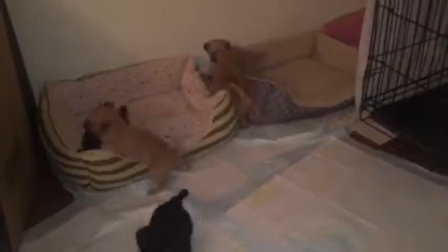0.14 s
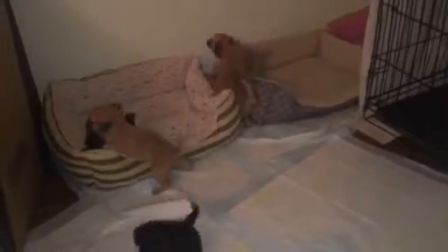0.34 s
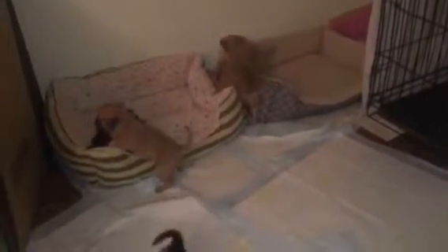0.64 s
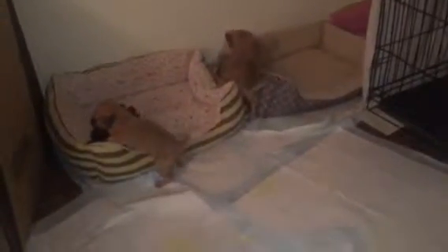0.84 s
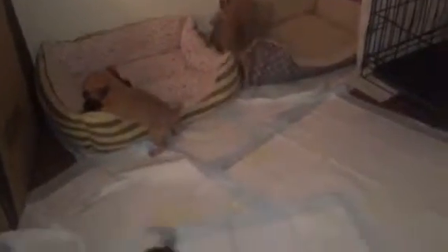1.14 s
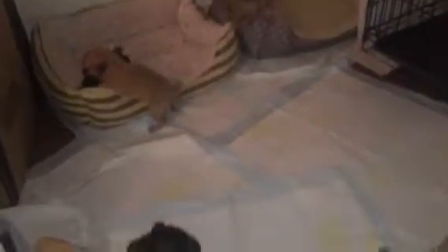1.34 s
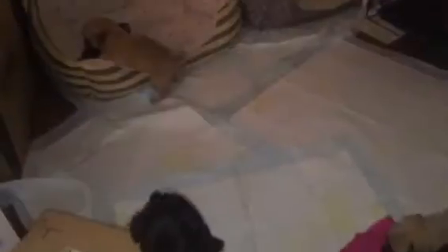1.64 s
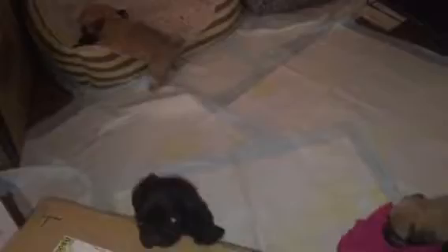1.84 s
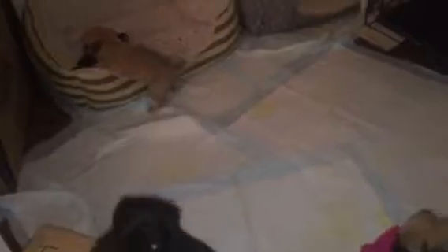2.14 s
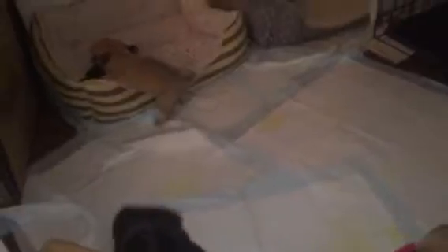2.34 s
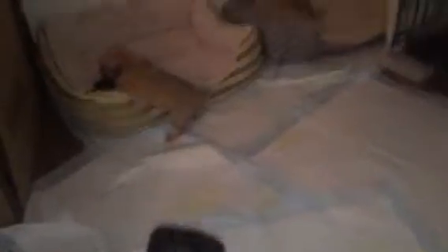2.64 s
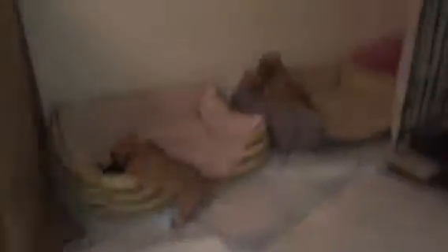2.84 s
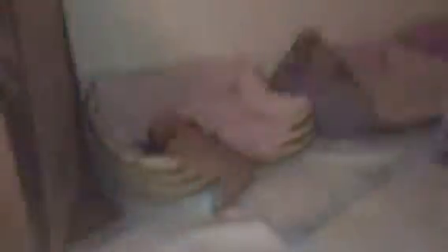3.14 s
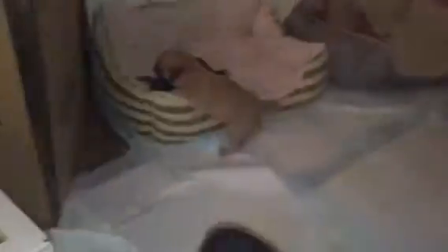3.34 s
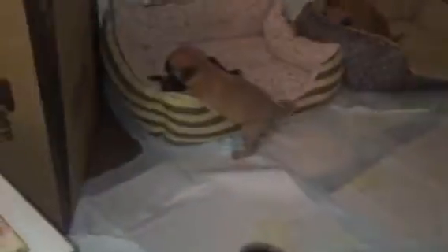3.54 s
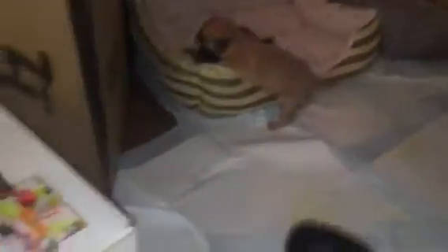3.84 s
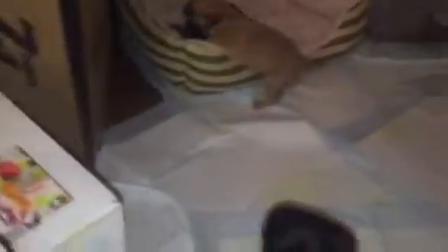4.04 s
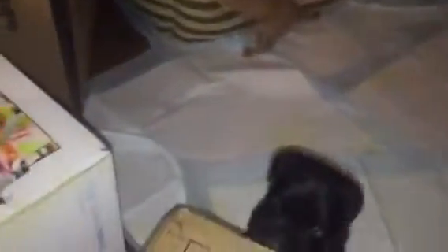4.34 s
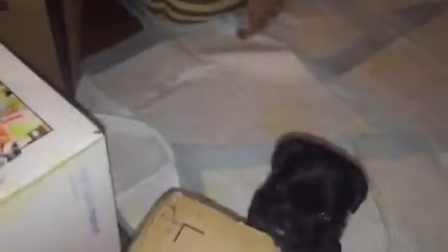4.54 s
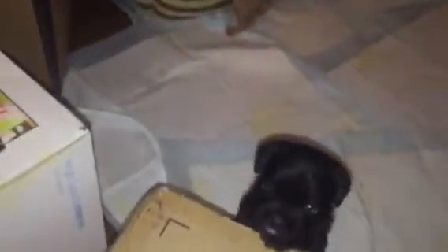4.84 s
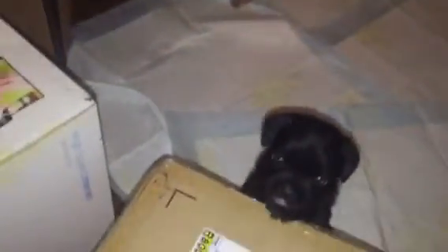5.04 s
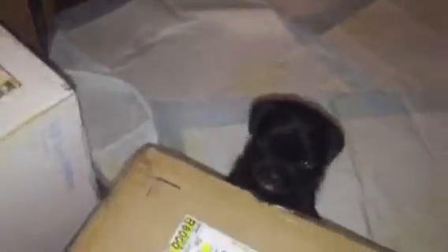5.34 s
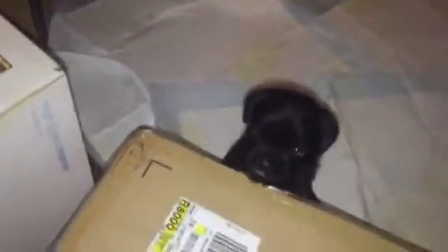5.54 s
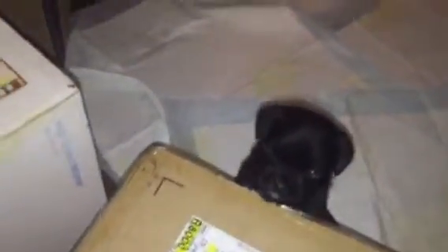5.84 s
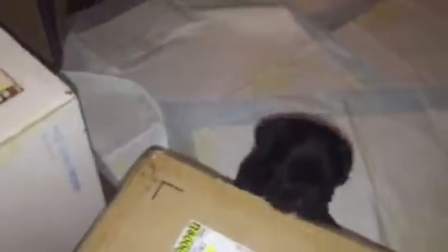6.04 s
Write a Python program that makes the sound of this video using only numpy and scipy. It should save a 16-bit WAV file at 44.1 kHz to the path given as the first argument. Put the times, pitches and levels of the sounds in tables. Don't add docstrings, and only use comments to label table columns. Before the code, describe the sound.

Young puppies scrabble over crinkly plastic-backed pads in a small room, claws ticking and bodies bumping a hollow box, with one short hoarse whine over a low hum.

```python
import sys
import numpy as np
from scipy import signal
from scipy.fft import rfft, irfft, next_fast_len
from scipy.io import wavfile
from scipy.ndimage import uniform_filter1d, map_coordinates

SR = 44100
rng = np.random.default_rng(int(sys.argv[2]) if len(sys.argv) > 2 else 0)


def gain_from_db(level_db):
    decades = np.asarray(level_db, float) / 20
    return 10 ** decades


def to_wav(s):
    ch = np.atleast_2d(s).T
    pcm = np.round(np.clip(ch, -1, 1) * 32767)
    wavfile.write(sys.argv[1], SR, pcm.astype(np.int16))


N = 272538
SOFT_BUMP = 0.052


def unit(x):
    return x / np.sqrt(np.mean(x ** 2) + 1e-20)


def along(points, hz):
    f, v = np.transpose(points)
    return np.interp(np.log(hz + 1), np.log(f + 1), v)


def curves(rows):
    s, *columns = np.transpose(rows)
    t = np.arange(N) / SR
    return [np.interp(t, s, column) for column in columns]


def wobble(rate):
    knots = rng.standard_normal(int(N * rate / SR) + 4)
    return map_coordinates(knots, [np.arange(N) * rate / SR])


def swell(peak_s, rise_s, fall_s, db):
    marks = np.arange(0, N + 32, 32)
    t = marks / SR - peak_s
    distance = np.where(t < 0, -t / max(rise_s, .002), t / max(fall_s, .002))
    gain = gain_from_db(db - 20 * distance ** 1.16)
    return np.interp(np.arange(N), marks, gain)


def filtered(x, response):
    m = next_fast_len(len(x) + 4096)
    return irfft(rfft(x, m) * response(np.fft.rfftfreq(m, 1 / SR)), m)[:len(x)]


def ring(hz, width_hz):
    return lambda f: 1j * f * width_hz / (hz * hz - f * f + 1j * f * width_hz + 1e-9)


def add(track, s, sound):
    part = track[round(s * SR):][:len(sound)]
    part += sound[:len(part)]


def bump_rows():
    # start in seconds, peak in dB, note in Hz, 60 dB decay in seconds.
    flops = [(0.159, -51, 102, 0.035), (0.464, -61, 310, 0.13), (0.959, -48.5, 282, 0.17),
             (1.085, -37, 265, 0.055), (1.097, -35, 260.4, 0.15), (1.17, -50, 137, 0.13),
             (2.046, -55.5, 74, 0.044), (2.465, -44.5, 70, 0.039), (2.579, -43.5, 238, 0.077),
             (2.595, -47.5, 208, 0.16), (4.092, -42, 397, 0.046), (4.135, -41, 103, 0.054),
             (4.206, -62, 71, 0.042), (4.548, -47, 278, 0.056), (6.081, -52.5, 84, 0.058),
             (6.142, -52.5, 350, 0.1)]
    # start in seconds, peak in dB, note in Hz, 60 dB decay in seconds.
    knocks = [
        (.931, -36, 107, 0.1),
        (1.032, -39.5, 101, 0.1),
        (1.76, -49, 253, 0.27),
        (1.851, -47, 310, 0.043),
        (2.212, -30.5, 189, 0.065),
        (2.226, -37, 169, 0.063),
        (3.221, -47.5, 101, 0.049),
        (3.424, -41.5, 530, 0.053),
        (5.363, -40, 138, 0.0091),
        (5.671, -51, 126, 0.016),
    ]
    return sorted([(*row, SOFT_BUMP) for row in flops] + [(*row, 0.22) for row in knocks])


def background():
    # time in seconds, level in dB.
    hum_levels = [(0, -59), (.85, -58), (1.0, -73), (1.35, -60), (2.4, -64.5), (3.25, -63.5), (3.4, -69),
                  (3.63, -68), (3.85, -82), (4.1, -60), (4.35, -73.5), (4.7, -64.5), (5.4, -73.5),
                  (5.9, -68), (6.18, -68)]
    # time in seconds, level in dB.
    fifth_levels = [(0, -84), (.6, -75), (1.2, -78.5), (1.6, -72.5), (2.0, -71), (2.4, -73), (2.9, -67),
                    (3.3, -72), (3.5, -75), (3.85, -76), (4.0, -69), (4.35, -73), (4.55, -90), (5.0, -74.5),
                    (5.4, -81.5), (5.6, -96), (5.9, -86), (6.18, -71)]
    # fastest moment, rise and fall in seconds, rumble in dB.
    pans = [
        (3.05, 1.8, 1, -63),
        (4.65, 0.84, 1.0, -72.5),
    ]
    # frequency in Hz, level in dB per Hz.
    rumble_tone = [(12, -63), (20, -22), (61, -7), (91, -6), (113, -0.5), (145, -7), (174, -7),
                   (450, -28.5), (580, -65), (990, -120)]
    # frequency in Hz, level in dB per Hz.
    air_tone = [(180, -29), (300, 6), (537, -20), (593, -18), (645, 1), (1030, 3), (1560, -9), (4160, -4.5),
                (10400, -9.5), (14700, -13.5), (16000, -8.5)]
    hum_db, = curves(hum_levels)
    fifth_db, = curves(fifth_levels)
    sway_db = 2.5 * (np.arange(N) / SR > 0.85)
    shake = gain_from_db(-70 + 0.1 * (hum_db - hum_db.mean())) + sum(swell(*row) for row in pans)
    floor_t60_s = 1.42
    fade_db = -60 * np.arange(SR) / SR / floor_t60_s
    for s, db, hz, t60, hard in bump_rows():
        add(shake, s, 10 * t60 * gain_from_db(db - 27.5 + fade_db))
    mains_hz = 120
    phase = 2 * np.pi * mains_hz * np.arange(N) / SR
    hum = gain_from_db(hum_db + 3 + (.7 + sway_db) * wobble(14)) * np.sin(phase + .2 * wobble(6))
    fifth = gain_from_db(fifth_db - 1.5 + 4.5 * wobble(20)) * np.sin(5 * phase + .3 * wobble(10))
    rumble = unit(filtered(rng.standard_normal(N), lambda f: gain_from_db(along(rumble_tone, f))))
    hiss = unit(filtered(rng.standard_normal(N), lambda f: gain_from_db(along(air_tone, f))))
    return hum + fifth + shake * gain_from_db(3 * wobble(9)) * rumble + gain_from_db(-75 + 1.4 * wobble(3.03)) * hiss


def room(x):
    # frequency in Hz, 60 dB decay in seconds.
    decay = [(300, 0.44), (2000, 0.12), (12000, 0.098)]
    hz, t, z = signal.stft(rng.standard_normal(SR // 2), SR, nperseg=256)
    tail = signal.istft(z * gain_from_db(-60 * t / along(decay, hz)[:, None]), SR, nperseg=256)[1]
    return signal.fftconvolve(np.pad(x, (200, 0)), tail / np.linalg.norm(tail))[:N]


def walls(x):
    # delay in seconds, level in dB.
    echoes = [
        (.0011, -47),
        (.0029, -32),
        (.0052, -24),
    ]
    return filtered(x, lambda f: 1 + sum(gain_from_db(db) * np.exp(-2j * np.pi * f * s) for s, db in echoes))


def creases(spiky_db):
    return rng.standard_normal(N) * gain_from_db(spiky_db * wobble(900) + 2.03 * wobble(70))


def stir():
    # time in seconds, level in dB.
    busy = [(0.0, -64.5), (0.65, -71), (0.95, -68.5), (1.08, -58.5), (1.29, -62), (1.58, -64.5),
            (2.12, -72), (2.34, -65), (2.87, -71.5), (3.03, -62), (3.42, -64.5), (3.61, -68), (3.75, -64),
            (4.04, -62), (4.65, -70), (5.15, -72.5), (6.09, -75), (6.14, -47), (6.18, -57)]
    # centre in Hz, width in Hz, level in dB.
    bedding = [(1550, 740, 3.5), (2640, 346, 4.5), (3000, 900, -0.5)]
    # peak in seconds, fade in seconds, level in dB.
    brushes = [
        (0.0, 0.79, -64.5),
        (1.58, 0.6, -68),
        (3.2, 0.46, -73),
        (6.1, 0.97, -76.5),
    ]
    rustle_db, = curves(busy)
    body_db = -68 + 0.84 * (rustle_db - rustle_db.mean())
    brushing = sum(swell(s, fade_s, fade_s, db) for s, fade_s, db in brushes)
    cloth = lambda f: sum((-1) ** k * gain_from_db(db) * ring(hz, w)(f) for k, (hz, w, db) in enumerate(bedding))
    rustle = gain_from_db(rustle_db - 1.0 + 4.2 * wobble(21.63)) * unit(filtered(creases(spiky_db=1.0), cloth))
    fur = unit(filtered(creases(spiky_db=0.0), lambda f: ring(5500, 1800)(f) ** 2))
    hiss = brushing * gain_from_db(-1.5 + 0.54 * wobble(14)) * fur
    patches_db = 3 * wobble(25)
    soft = unit(filtered(creases(spiky_db=2.5), lambda f: ring(330, 600)(f) ** 2))
    return rustle + hiss + gain_from_db(body_db - 6.0 + patches_db) * soft


def bumps(rows):
    out, t = np.zeros(N), np.arange(SR // 2) / SR
    for s, db, hz, t60, hard in rows:
        shape = gain_from_db(-60 * t / max(t60, .02)) * (1 - np.exp(-t / 0.0017))
        panel_hz = rng.uniform([170, 240, 320], [240, 300, 400])
        panels = sum(np.sin(2 * np.pi * f * t) * rng.uniform(0.1, 1) for f in panel_hz)
        note = shape * (np.sin(2 * np.pi * hz * t) + 0.79 * panels)
        shove = (1 - t / .0007) * np.exp(-t / .0007) * (1 - np.exp(-t / .0004))
        add(out, s, gain_from_db(db + 3.0) * (note + hard * shove))
    return out


def more_flops():
    # start in seconds, peak in dB, note in Hz, 60 dB decay in seconds.
    pushes = [
        (.385, -57.5, 203, .08),
        (1.13, -46.5, 301, 0.14),
        (1.875, -52, 200, 0.086),
        (2.093, -47, 172, 0.12),
        (2.187, -43.5, 430, 0.038),
        (3.226, -43.5, 220, 0.032),
        (3.97, -56, 330, 0.078),
    ]
    return bumps([(*row, SOFT_BUMP) for row in pushes])


def whine():
    # time in seconds, pitch in Hz, level in dB.
    cry = [
        (2.812, 780, -83),
        (2.825, 790, -48),
        (2.84, 835, -54),
        (2.866, 797, -39.5),
        (2.885, 754, -61),
        (2.905, 790, -60),
        (2.93, 790, -76),
    ]
    hz, db = curves(cry)
    phase = 2 * np.pi * np.cumsum(hz * (1 + .05 * wobble(400))) / SR
    throat = lambda f: ring(800, 220)(f) ** 2 - 0.19 * ring(2100, 900)(f) ** 2
    breath = unit(filtered(rng.standard_normal(N), throat))
    voice = .45 * np.sin(phase) + .8 * breath
    t = np.arange(N) / SR
    return gain_from_db(db - 4.0 + 3.8 * wobble(160)) * voice * (t > cry[0][0]) * (t < cry[-1][0])


def sizzle():
    # fastest moment, rise and fall in seconds, level in dB.
    skims = [
        (2.421, 0.067, .1, -73),
        (2.86, .03, .06, -71),
        (3.01, 0.099, 0.036, -59),
        (3.69, .08, .05, -69),
        (3.93, .1, .04, -74),
        (5.56, 0.055, .04, -63),
    ]
    grain = unit(filtered(creases(spiky_db=2.5), lambda f: ring(7500, 2200)(f) ** 2))
    return sum(swell(*row) for row in skims) * grain


def scuffs():
    # fastest moment, rise and fall in seconds, level in dB, resonance in Hz.
    rubs = [(.26, 0.054, .05, -67, 1300), (.45, .04, .05, -61.5, 683), (.91, .015, 0.033, -49, 1700),
            (1.055, .03, 0.015, -58, 2800), (1.1, 0.012, 0.045, -48, 1700), (1.171, 0.0088, .02, -48, 2730),
            (1.24, .02, .05, -55, 1680), (1.33, .02, .03, -61, 2600), (1.46, 0.033, 0.044, -59.5, 1710),
            (1.57, 0.017, 0.018, -63, 1750), (1.605, .02, 0.028, -63, 2000), (1.88, .02, 0.049, -54, 2600),
            (2.42, 0.066, 0.038, -52, 3000), (2.6, 0.033, 0.065, -56, 3000), (2.85, .04, 0.076, -55, 2100),
            (2.97, .04, 0.037, -54.5, 2840), (3.02, .03, .05, -53.5, 2600), (3.12, 0.066, .06, -55, 2230),
            (3.45, .02, 0.053, -54, 4200), (3.575, .02, .03, -59, 2000), (3.675, 0.045, .07, -55, 3100),
            (3.8, .03, .04, -62, 1500), (3.88, .04, .05, -62, 900), (3.93, .08, .05, -63, 2400),
            (4.094, 0.013, 0.024, -31.5, 3310), (4.19, .04, 0.069, -65, 2630),
            (4.4, 0.025, 0.044, -63, 3200), (4.46, .03, 0.068, -66, 2490), (4.55, .003, .012, -44, 2200),
            (4.57, .015, .05, -54, 3580), (4.77, .05, .08, -64.5, 1600), (4.89, .02, 0.027, -62, 1890),
            (4.93, .02, .02, -72, 1900), (5.15, .08, 0.072, -72, 1800), (6.045, 0.016, .03, -70, 2180),
            (6.125, .015, .015, -49.5, 1390)]
    out, grain, reach = np.zeros(N), creases(spiky_db=4), SR // 5
    for s, rise_s, fall_s, db, hz in rubs:
        near = slice(max(round(s * SR) - reach, 0), round(s * SR) + reach)
        song = unit(filtered(grain[near], lambda f: ring(hz, hz / 4.5)(f) ** 2))
        out[near] += swell(s, rise_s, fall_s, db)[near] * song
    return out


def crinkle(lo_hz, hi_hz, spiky_db):
    # frequency in Hz, level in dB per Hz.
    sheet_tone = [(210, -33), (350, -5), (1100, -9.5), (1600, -1.5), (2800, -1.5), (4000, -4.5),
                  (5000, -10), (6300, -1.5), (10400, -12), (14500, -11), (16000, -22)]
    edges = lambda f: np.sqrt((1 + (lo_hz / (f + 1)) ** 8) * (1 + (f / hi_hz) ** 8))
    return unit(filtered(creases(spiky_db), lambda f: gain_from_db(along(sheet_tone, f)) / edges(f)))


def pocket(x, centre_hz, width_hz, lift):
    f, t, z = signal.stft(x, SR, nperseg=512)
    centre = np.interp(t * SR, np.arange(N), centre_hz)
    ridges = uniform_filter1d(rng.standard_normal(z.shape), size=2, axis=0)
    ridges = unit(uniform_filter1d(ridges, size=8, axis=1))
    gain = (1 + lift / (1 + ((f[:, None] - centre) / width_hz) ** 2)) * gain_from_db(3.2 * ridges)
    return unit(signal.istft(z * gain, SR, nperseg=512)[1][:N])


def drag():
    # fastest moment, rise and fall in seconds, level in dB, air pocket in Hz.
    kneads = [
        (.45, 0.1, 0.084, -72.5, 1810),
        (2.22, 0.058, 0.02, -60, 2300),
        (2.6, 0.023, 0.2, -76, 2650),
    ]
    skids = [
        (.965, 0.035, 0.076, -45.5, 2360),
        (1.168, 0.014, 0.055, -48, 2570),
        (1.225, 0.0064, 0.08, -52.5, 1650),
        (2.095, 0.014, 0.064, -48.5, 2520),
        (2.49, 0.05, 0.07, -63.5, 2850),
        (2.99, 0.1, 0.066, -55.5, 2880),
        (3.7, 0.082, 0.053, -57, 3100),
        (5.58, 0.044, 0.039, -48.5, 2860),
        (2.42, 0.029, 0.19, -56, 2950),
        (2.845, 0.011, 0.072, -77, 2260),
    ]
    slides = [
        (.256, 0.057, 0.035, -58, 2200),
        (.924, 0.034, 0.012, -41.5, 2280),
        (1.12, .012, 0.058, -47.5, 2250),
        (1.309, 0.0039, 0.034, -58, 1770),
        (1.875, 0.049, 0.067, -53.5, 2500),
        (2.402, 0.028, 0.1, -50.5, 2980),
        (2.608, 0.023, 0.047, -56, 3070),
        (3.655, 0.04, 0.13, -53.5, 3030),
        (5.5, 0.017, 0.054, -53, 1740),
        (5.545, 0.048, 0.02, -48.5, 2920),
    ]
    shoves = [
        (.39, 0.085, 0.044, -59, 1850),
        (.626, 0.075, 0.071, -60.5, 1880),
        (2.86, 0.03, .05, -50.5, 1900),
        (3.11, 0.042, 0.071, -47, 1900),
        (4.1, 0.0039, 0.013, -35.5, 1900),
        (4.136, .03, 0.044, -49, 2070),
        (4.78, 0.22, 0.83, -70, 1800),
        (6.155, 0.025, 0.023, -48, 2370),
    ]
    # strokes, bright fizz in dB, low body in dB.
    kinds = [(kneads, -12, 10.5), (skids, -0.015, -11), (slides, -12, -15), (shoves, -12, -0.6)]
    hz, = curves(sorted((row[0], row[-1]) for rows, *_ in kinds for row in rows))
    speed = np.array([sum(swell(*row[:-1]) for row in rows) for rows, *_ in kinds])
    fizz_db, body_db = np.transpose([kind[1:] for kind in kinds])
    sheet = pocket(crinkle(1500, 5000, spiky_db=3.5), hz, width_hz=380, lift=2)
    fizz = crinkle(2800, 24000, spiky_db=2.5)
    body = crinkle(547, 1350, spiky_db=1.5)
    return speed.sum(axis=0) * sheet + gain_from_db(fizz_db) @ speed * fizz + gain_from_db(body_db) @ speed * body


def contacts(rows, crack_s, rise_s, spike, sharp, after_s, trim_db):
    lead_s = .008
    thin_hz = 633
    bounce_cycles, bounce_gain = 5.5, 0.22
    out, t = np.zeros(N), np.arange(SR // 4) / SR - lead_s
    since = np.maximum(t, 0)
    for s, db, hz, low_db, after_db, bright_db in rows:
        noise = rng.standard_normal((2, len(t)))
        crack = noise[0] * gain_from_db(-60 * since / crack_s) * (1 - np.exp(-since / rise_s))
        crack[round(lead_s * SR) + 2] = spike
        tighten = np.exp(np.minimum(t - .002, 0) / 0.0042)
        after = noise[1] * gain_from_db(after_db - 15.0 - 60 * since / after_s) * tighten

        def colour(f):
            thin = (1j * f / (1j * f + thin_hz)) ** 4
            sheet = (ring(hz, hz / sharp)(f) + 0.32 * ring(3500, 4500)(f) ** 2) * thin
            weight = gain_from_db(low_db + 13) * ring(950, 1200)(f) ** 2
            bright = gain_from_db(bright_db - 12.0) * ring(10500, 9000)(f)
            bounce = 1 + bounce_gain * np.exp(-2j * np.pi * bounce_cycles * f / hz)
            return (sheet - weight + bright) * bounce

        main = np.abs(filtered(crack, ring(2300, 5470))).max()
        add(out, s - lead_s, gain_from_db(db + trim_db) / main * filtered(crack + after, colour))
    return out


def snaps():
    # start in seconds, peak in dB, ring in Hz, slip after it in dB.
    folds = [(0.381, -29, 6200, -10), (0.627, -40, 3000, 5), (0.6317, -45, 3000, 0),
             (0.925, -27, 2540, -10), (.929, -29, 10900, -10), (0.9553, -28, 6800, -10),
             (0.9637, -19.5, 5860, -15), (1.095, -33, 6500, -5), (1.1035, -33.5, 7200, -10),
             (1.1644, -29.5, 6900, -3), (1.2185, -33, 4500, -10), (1.7589, -29, 6040, -15),
             (1.8535, -28, 2300, -12), (2.193, -34, 6960, -5), (2.218, -35, 7960, -9),
             (2.6844, -47, 2900, -5), (3.0912, -25, 3000, -21), (3.4253, -23.5, 5530, -12),
             (3.562, -39, 6500, -8), (3.574, -45, 7000, -10), (3.7075, -35, 5000, -5),
             (3.7374, -18, 3400, -22), (3.9735, -25, 9000, -10), (3.9884, -34, 7000, -11),
             (4.0586, -30, 8000, -5), (4.0712, -16.5, 3440, -22), (4.082, -31, 8000, -15),
             (4.088, -24, 3180, -22), (4.1086, -19.5, 8900, -15), (4.3117, -47, 2750, -8),
             (4.3815, -28, 2930, -25), (4.5515, -25, 2700, -4), (4.7124, -40.5, 9000, -5),
             (4.9423, -47, 8350, 3), (4.983, -52, 7000, -5), (6.086, -47, 5000, 5),
             (6.1406, -28, 9100, -15), (6.1475, -46, 6000, -15)]
    rows = [(s, db, hz, -60, after_db, -15) for s, db, hz, after_db in folds]
    return contacts(rows, crack_s=.003, rise_s=.00005, spike=2.4, sharp=5.4, after_s=.06, trim_db=2.5)


def pats():
    # start in seconds, peak in dB, ring in Hz, weight behind it in dB, slip after it in dB.
    paws = [(0.1206, -44, 5800, -46, 7.5), (0.378, -36, 6000, -17, 1.5), (0.909, -36, 1760, -40, -11),
            (0.9236, -35.5, 2360, -5.5, 3), (1.0847, -27.5, 1950, -4, 2), (1.1669, -37.5, 2740, -3, -30),
            (1.758, -27.5, 1640, -17.5, 5), (1.8516, -28, 2310, -10.5, -3),
            (2.0928, -40.5, 2300, -8.5, 11.5), (2.212, -26, 2790, -31, 0), (2.396, -61, 2950, -28, 14),
            (2.618, -42.5, 3260, 0, 4), (2.8677, -38.5, 1750, 4.5, -4), (3.092, -27, 1510, -2.5, -31),
            (3.2241, -27, 2310, -17, -2), (3.4219, -13.5, 1633, -65, -2.5), (3.7373, -19, 2080, -23, 1),
            (3.742, -17.5, 2530, -26, -16), (4.885, -42.5, 1950, -26, 6.5), (6.037, -48.5, 2220, -17, 10.5)]
    rows = [(*row, -43) for row in paws]
    return contacts(rows, crack_s=0.017, rise_s=0.00032, spike=2.9, sharp=2.6, after_s=0.2, trim_db=2.0)


def ticks():
    # start in seconds, peak in dB, ring in Hz, weight behind it in dB, slip after it in dB.
    tips = [(0.9644, -15, 2150, -27, -24), (0.9837, -22.5, 2150, -13.5, 4),
            (2.1812, -31.5, 8500, -16, -0.5), (2.4694, -29.5, 2500, -18.5, 12),
            (3.276, -25.5, 1640, -16.5, 2), (3.3366, -33, 1750, -33, -16), (3.532, -43, 3820, -11, 11.5),
            (3.61, -33, 7900, -32, -3.5), (3.9622, -21, 3280, -18.5, -6), (3.973, -28, 3000, -13, 9.5),
            (4.0474, -19.5, 3540, -43, -1), (4.0912, -14, 3200, -15.5, -7), (4.098, -12, 1800, -14.5, -7),
            (4.1071, -29, 3380, -2.5, 7.5), (4.1394, -18.5, 3280, -25, -3.5), (4.384, -18, 3310, -32, -6.5),
            (4.5477, -13.5, 5150, -25, -6), (4.6467, -37, 3800, -9.5, -21), (4.708, -45, 3150, -43, 0),
            (4.8326, -35, 7000, -29, -17), (5.3412, -33, 3300, -35, -5), (5.387, -43.5, 2800, -35, 3),
            (5.5756, -21, 2800, -49, -8), (6.1354, -22, 2640, -24, -1)]
    # start in seconds, peak in dB, ring in Hz, weight behind it in dB, slip after it in dB.
    sides = [(1.2151, -22.5, 5140, -17, -6.5), (1.245, -42, 6500, -40, -15), (1.3095, -53, 1690, -18, -1),
             (1.34, -42, 6500, -40, 1), (2.085, -33.5, 2950, -26, 4), (3.0959, -32, 1510, 0, -9),
             (2.3035, -37, 5400, -12, -2), (2.686, -42, 2770, -13, 4), (3.4099, -28, 3840, -32, -4),
             (3.517, -24.5, 7300, -23, -7), (3.5644, -33, 3080, -8.5, 4.5), (4.003, -25.5, 5800, -21, -0.5),
             (4.0252, -23, 5830, -40, -9), (4.0566, -29, 3870, -35, -8), (4.074, -16.5, 3900, -20, -7),
             (4.0865, -14.5, 3430, -15, 2), (4.1666, -34.5, 3360, -8, 2), (4.2595, -43.5, 3070, 2.5, -4),
             (4.311, -38.5, 2860, -13, 2), (4.5923, -29, 4040, -49, -4), (4.992, -26.5, 2440, -31, -1),
             (5.0016, -25, 3860, -43, -16), (6.1405, -24, 2280, -32, -15), (6.1474, -16.5, 2440, -22, -6)]
    claws = sorted([(*row, -4) for row in tips] + [(*row, -46) for row in sides])
    return contacts(claws, crack_s=.0052, rise_s=.00005, spike=4.5, sharp=3.46, after_s=0.14, trim_db=3.5)


def scene():
    pups = walls(ticks() + pats() + drag()) + bumps(bump_rows()) + whine()
    around = gain_from_db(-15.5) * room(pups) + stir() + background()
    return (pups + around + snaps() + more_flops() + sizzle() + scuffs())[None]


def low_pass(x):
    return signal.sosfilt(signal.butter(12, 16840, fs=SR, output="sos"), x)


def record(dry):
    low_cut_hz, shelf_hz, top_hz = 45, 15800, 16800

    def band(f):
        treble = np.where(f < shelf_hz, 1, gain_from_db(-21)) * (f < top_hz)
        return treble / np.sqrt(1 + (low_cut_hz / (f + 1)) ** 4)

    return low_pass(filtered(dry[0], band)[None])


dry = scene()
out = record(dry)
to_wav(out)
```